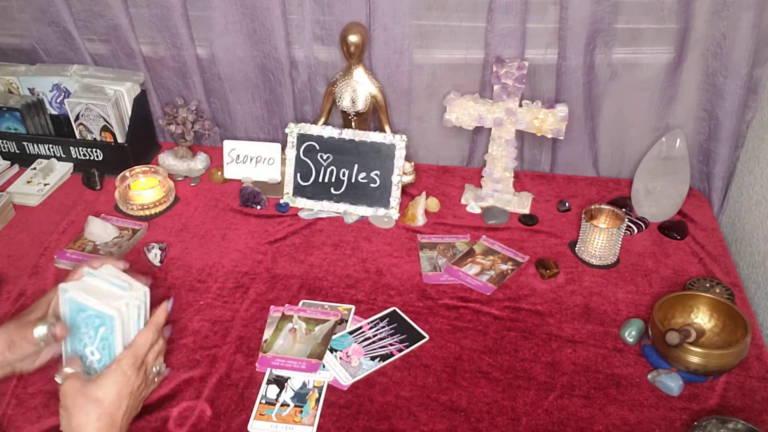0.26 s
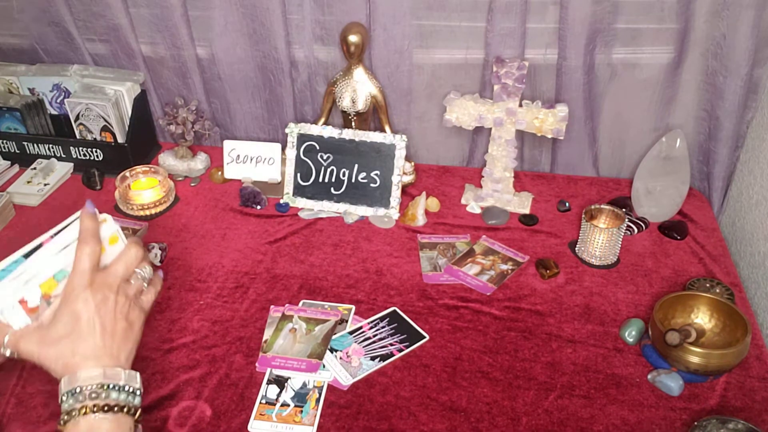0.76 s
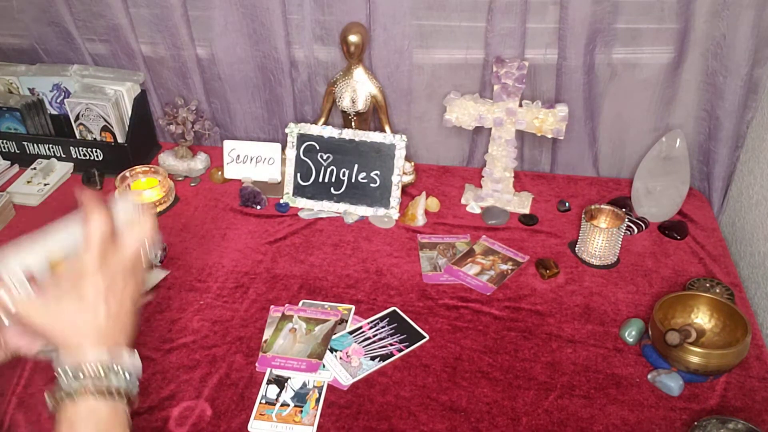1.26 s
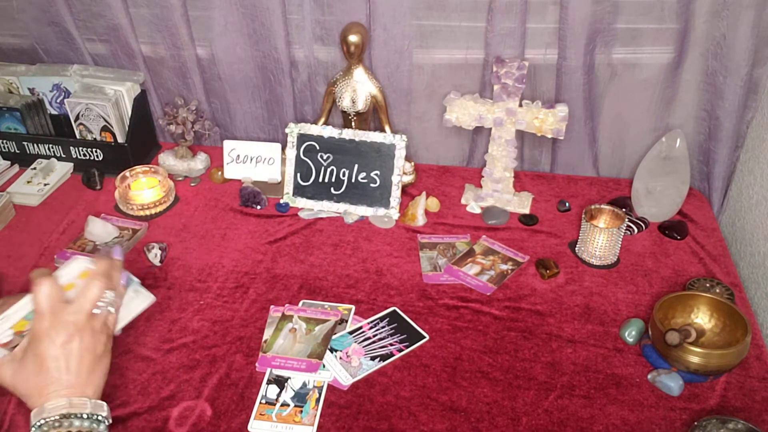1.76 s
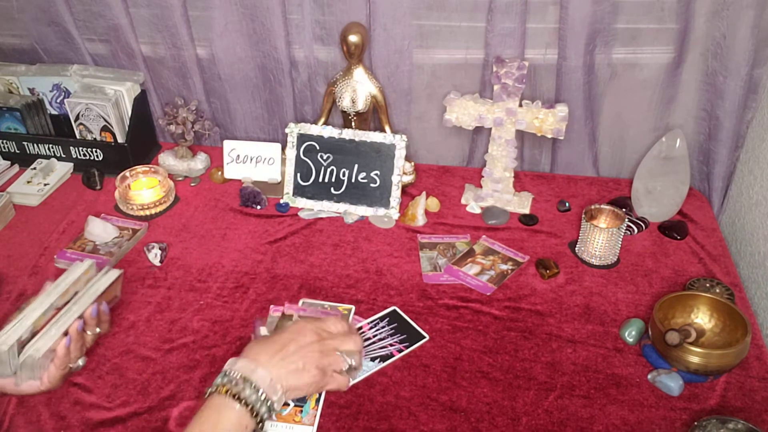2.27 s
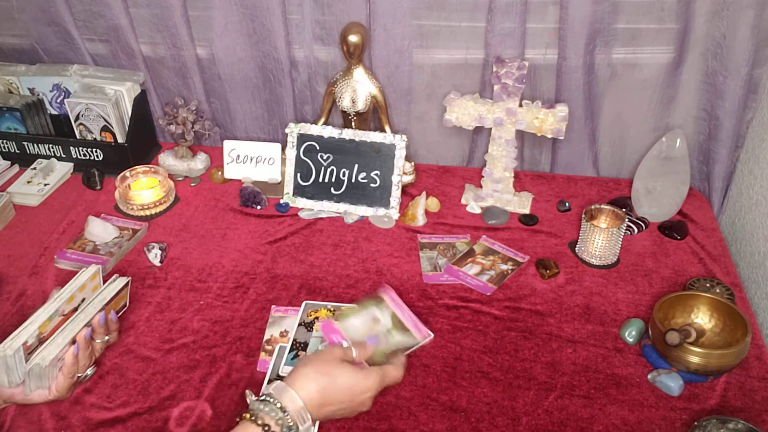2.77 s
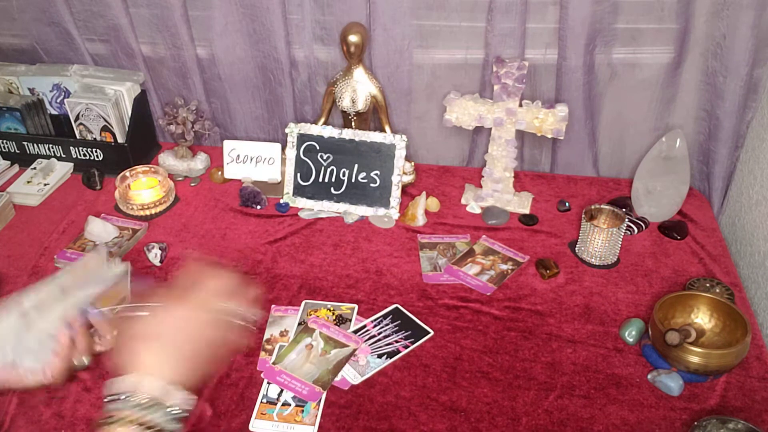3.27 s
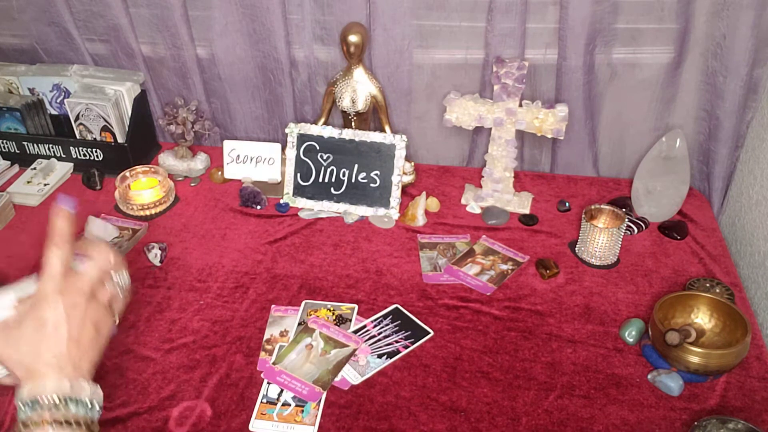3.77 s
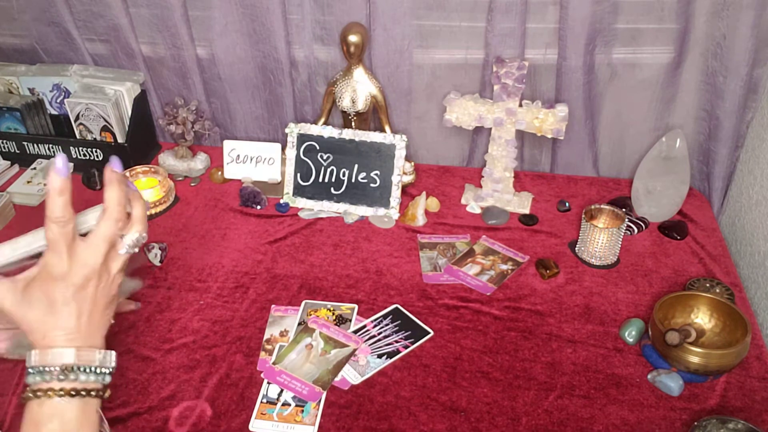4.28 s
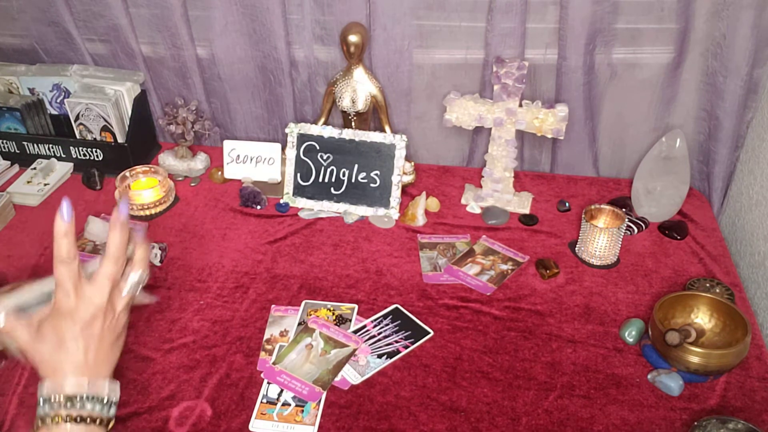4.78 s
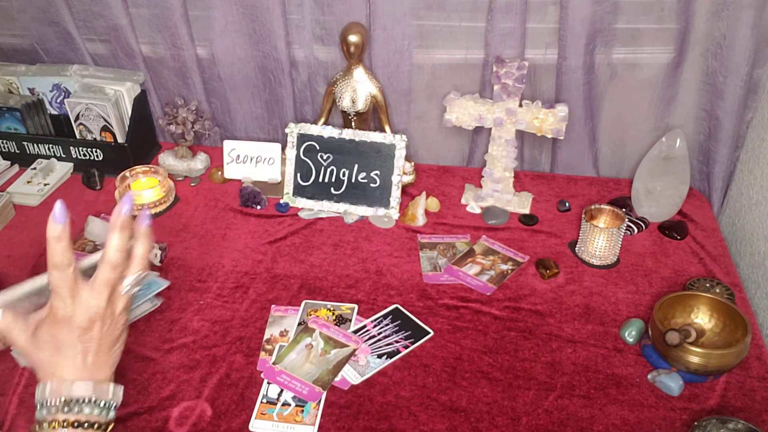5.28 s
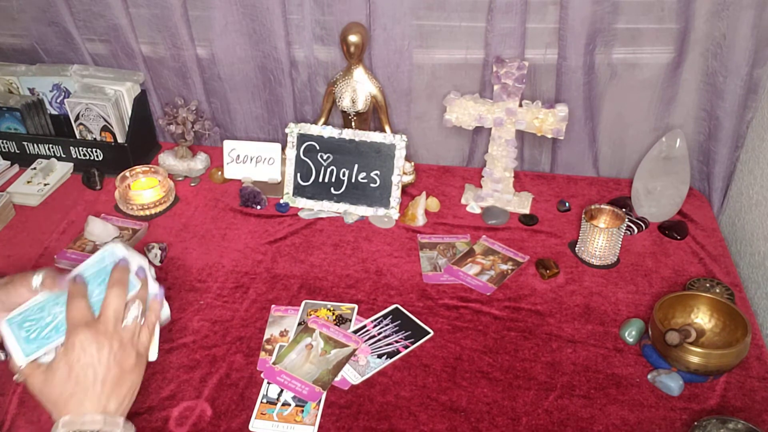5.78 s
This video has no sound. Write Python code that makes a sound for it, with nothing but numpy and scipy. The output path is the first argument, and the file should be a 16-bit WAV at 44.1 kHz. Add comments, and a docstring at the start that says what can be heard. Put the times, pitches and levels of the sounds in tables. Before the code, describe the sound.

In a small quiet room, a deck's edge knocks a cloth-covered table with a short woody ring. Hands then shuffle the cards: sharp papery snaps, loose flutter and grainy sliding. A softer pause follows as cards are handled lightly, then the shuffling returns faster and harder, with bright ring clinks and dry bead ticks. Close microphone, slight short echo.

```python
"""In a small quiet room, a thick deck of cards is shuffled overhand above a cloth-covered table.
First the deck is knocked on the table, which rings; then packets slap as snaps with loose flutter.
Sliding cards are grainy noise over a low rumble; finger rings clink as high ringing tones, and
bracelet beads tick as tiny noise bursts. Echoing delays give the hits their room."""
import sys
import numpy as np
from scipy import signal
from scipy.fft import rfft, irfft
from scipy.io import wavfile

SR = 44100
rng = np.random.default_rng(int(sys.argv[2]) if len(sys.argv) > 2 else 0)


def wav_record(signal):
    """Record a signal, one row per channel, as 16-bit PCM in the file named by sys.argv[1]."""
    frames = np.transpose(np.atleast_2d(signal))
    bounded = np.clip(frames, -1, 1)
    # unit amplitude maps onto the largest positive 16-bit level
    quanta = np.round(bounded * 32767).astype(np.int16)
    wavfile.write(sys.argv[1], SR, quanta)


N = 265967


def from_db(db):
    """Turn decibels into gain."""
    return 10 ** (np.asarray(db) / 20)


def rms_one(x):
    """Scale to an rms (average strength) of 1."""
    return x / np.sqrt(np.mean(x ** 2) + 1e-20)


def drift(rate_hz):
    """Slow random wander: noise through two equal one-pole low-passes, scaled to rms 1."""
    r = np.exp(-2 * np.pi * rate_hz / SR)
    settled = signal.lfilter([1], [1, -2 * r, r * r], rng.standard_normal(N + SR))[SR:]
    return rms_one(settled)


def ring(clicks, hz, t60):
    """Each click sets off a sine that falls by 60 dB in t60 seconds; a unit click starts it at height 1."""
    r = from_db(-60 / (t60 * SR))
    w = 2 * np.pi * hz / SR
    return signal.lfilter([0, np.sin(w)], [1, -2 * r * np.cos(w), r * r], clicks + 1e-18)


def band(x, low_hz, high_hz):
    """Keep only the pitches between two limits (Butterworth band-pass)."""
    limits = [low_hz, min(high_hz, 0.45 * SR)]
    return signal.sosfilt(signal.butter(2, limits, "band", fs=SR, output="sos"), x)


def burst(white, low_hz, high_hz, t60):
    """A dying burst of band noise with a peak of 1."""
    fade = from_db(-60 * np.arange(len(white)) / SR / t60)
    x = band(white, low_hz, high_hz) * fade
    return x / np.abs(x).max()


def coloured(x, spectrum):
    """Shape the tone of a noise by a spectrum table, then scale to rms 1."""
    hz, db = np.transpose(spectrum)
    grid = np.maximum(np.arange(N // 2 + 1) * SR / N, 1)
    gain = from_db(np.interp(np.log(grid), np.log(hz), db))
    return rms_one(irfft(rfft(x) * gain, N))


def grains(per_s, spread_db, smooth):
    """Tiny catches of card on card, uneven in size, over a smooth share of noise."""
    size_db = spread_db * np.minimum(rng.exponential(1, N), 3.5)
    sizes = from_db(size_db) * rng.choice([-1, 1], N)
    born = rng.random(N) < per_s * from_db(5 * drift(25)) / SR  # the catches come in clusters
    return rms_one(sizes * born) + smooth * rng.standard_normal(N)


def lumps(white, rate_hz, depth_db):
    """Uneven gain: loose cards touch and part again."""
    slow = signal.sosfilt(signal.butter(2, rate_hz, fs=SR, output="sos"), white)
    return from_db(depth_db * rms_one(slow))


def add(out, s, sound):
    """Mix a short sound in at time s."""
    at = round(s * SR)
    out[at:at + len(sound)] += sound[:N - at]


ROOM_T60_S, WALL_CUT_HZ, ROOM_DB = 0.46, 6700, -24  # fading time before the walls' dulling; dulling; level


def room(x):
    """Eight delays feed back into themselves, and each echo returns weaker and duller."""
    out = np.zeros(N)
    dull = np.exp(-2 * np.pi * WALL_CUT_HZ / SR)
    lags = (rng.uniform(0.011, 0.03, 8) * SR).astype(int)
    for k, lag in enumerate(lags):
        loop = x.copy()
        gain, state = from_db(-60 * lag / SR / ROOM_T60_S), [0.]
        for i in range(lag, N, lag):  # one block is one trip round the loop
            back, state = signal.lfilter([gain * (1 - dull)], [1, -dull], loop[i - lag:i], zi=state)
            loop[i:i + lag] += back[:N - i]
        out += (loop - x) * (-1) ** k
    return out


# How busily the cards slide, low when the hands pause; before random swells: (time [s], level [dB])
SLIDE_LEVEL = [(0, -50), (.09, -58), (.22, -53.5), (.34, -61), (.63, -61.5), (.69, -69), (.76, -57),
               (1.17, -60.5), (1.24, -70.5), (1.42, -50.5), (1.6, -58), (1.85, -63), (2.05, -60),
               (2.14, -75.5), (2.3, -74.5), (2.38, -59), (2.6, -59.5), (2.74, -70), (2.93, -67),
               (3.0, -55.5), (3.2, -58), (3.33, -63), (3.45, -57.5), (3.9, -52.5), (4.08, -56), (4.2, -59),
               (4.87, -47.5), (5.0, -51.5), (5.48, -44.5), (5.68, -55), (5.86, -49.5), (6.03, -61)]
# Tone of the hands' low rumble: (frequency [Hz], relative level [dB per Hz])
RUMBLE_TONE = [(15, -28), (30, -9.5), (55, 7), (110, -8), (220, -14), (450, -27.5), (900, -43.5)]
# Tone of card faces rubbing: (frequency [Hz], relative level [dB per Hz])
RUB_TONE = [(250, -12), (400, -0.5), (800, -5.5), (1300, -3), (2200, -7), (3500, -4), (5000, -3.5),
            (7000, -26), (10000, -29)]
# Tone of the bright card hiss: (frequency [Hz], relative level [dB per Hz])
HISS_TONE = [(2500, -14), (4500, 5.5), (6500, 7), (9000, 2.5), (12500, -1.5), (15000, -16.5), (16000, -5),
             (18000, -23)]
RUMBLE_DB, HISS_UNDER_RUB_DB = -49.5, -4.5  # at the mean rub level
RUMBLE_FOLLOWS, HISS_FOLLOWS = 0.4, 1.4  # share of the rub's swing in dB


def sliding():
    """Rumble of the hands, and the grainy rub and hiss of card faces and edges."""
    rub_db = np.interp(np.arange(N) / SR, *np.transpose(SLIDE_LEVEL))
    swing_db = rub_db - rub_db.mean()
    rumble_db = RUMBLE_DB + RUMBLE_FOLLOWS * swing_db
    hiss_db = rub_db.mean() + HISS_UNDER_RUB_DB + HISS_FOLLOWS * swing_db
    stick = drift(30)  # stick and slip swells rub and hiss together
    wobble_db = 2.5 * drift(10)
    rumble = from_db(rumble_db + wobble_db) * coloured(rng.standard_normal(N), RUMBLE_TONE)
    rub_noise = coloured(grains(600, spread_db=6.0, smooth=1.1), RUB_TONE)
    hiss_noise = coloured(grains(330, spread_db=19.5, smooth=1.0), HISS_TONE)
    rub = from_db(rub_db + 3.1 * stick) * rub_noise
    hiss = from_db(hiss_db + 3.4 * stick) * hiss_noise
    return rumble + rub + hiss


# Card faces dragged over each other; lengths are held to 0.01-0.24 s:
# (start time [s], length [s], level [dB], card pitch [Hz])
CARD_DRAGS = [(0.164, 0.088, -44, 2540), (0.943, 0.066, -66, 900), (1.095, 0.073, -49.5, 1510),
              (1.4, 0.097, -41, 1320), (1.885, 0.064, -42, 1250), (1.92, 0.054, -48, 1330),
              (1.968, 0.097, -49, 1220), (2.345, 0.075, -58, 1520), (2.414, .2, -56, 2290),
              (2.959, 0.088, -52, 1290), (3.009, 0.16, -52, 2180), (3.124, 0.11, -53.5, 1450),
              (3.363, 0.096, -48.5, 4350), (4.127, 0.027, -23, 1350), (4.207, 0.043, -34, 1410),
              (4.462, 0.14, -42, 1840), (4.76, 0.025, -23.5, 1320), (4.801, 0.094, -38, 1700),
              (5.071, 0.037, -32.5, 1610), (5.402, 0.036, -29, 1380), (5.473, 0.021, -26.5, 1750),
              (5.728, 0.063, -34, 1720), (5.765, 0.2, -45.5, 1600), (5.827, 0.021, -47, 9000)]


def drags():
    """Grainy friction over a wide band, leaning on the card's pitch, swells and fades smoothly."""
    out = np.zeros(N)
    noise = rng.standard_normal((len(CARD_DRAGS), 2, SR // 4))
    for (s, length, db, hz), white in zip(CARD_DRAGS, noise):
        swell = np.hanning(int(np.clip(length, 0.01, 0.24) * SR))
        catches = white[0] * lumps(white[1], 890, depth_db=4.0)
        wide = rms_one(band(catches, 0.32 * hz, hz + 3500))
        lean = rms_one(band(catches, 0.82 * hz, 1.22 * hz))
        friction = (wide + 0.7 * lean)[:len(swell)]
        add(out, s, from_db(db) * swell * friction)
    return out


# Bracelet beads ticking against each other: (time [s], peak level [dB])
BEAD_TICKS = [(0.5382, -41), (.72, -26.5), (0.749, -35), (1.281, -27), (1.4123, -16), (1.4618, -26),
              (1.5164, -28), (1.611, -17), (1.628, -26), (1.6375, -38), (1.723, -25), (1.7388, -22),
              (1.761, -22), (2.215, -42), (2.237, -24), (2.298, -31.5), (2.7305, -37.5), (2.7784, -41),
              (3.0493, -28.5), (3.403, -24), (3.733, -17.5), (3.787, -23), (3.879, -32.5), (3.915, -41),
              (4.3181, -42), (4.357, -25), (4.507, -20), (4.6832, -39), (4.806, -17), (4.914, -20),
              (4.9355, -29), (4.9573, -17), (5.017, -33), (5.281, -12.5), (5.449, -16.5), (5.529, -25),
              (5.5544, -35), (5.5664, -43), (5.797, -25), (5.896, -29), (5.915, -31)]


def beads():
    """Beads hit dryly: noise bursts that die in milliseconds, each with its own bright colour."""
    out = np.zeros(N)
    noise, hues = rng.standard_normal((len(BEAD_TICKS), SR // 50)), rng.random(len(BEAD_TICKS))
    for (s, peak_db), white, hue in zip(BEAD_TICKS, noise, hues):
        tick = burst(white, 3000 + 4000 * hue, 15300, 0.0057)
        add(out, s, from_db(peak_db) * tick)
    return out


# Jewellery clinks; low and middle are relative to the overall level and add to the ring levels below:
# (time [s], overall level [dB], low ring [dB], middle ring [dB])
JEWELLERY_CLINKS = [(0.7203, -32.5, 4, 13), (1.288, -26, 3, -29), (1.6107, -32, -34, -23),
                    (1.634, -36, -31, -8), (1.756, -33, -22, -16), (2.2022, -30.5, -1, -12),
                    (2.2961, -27, -36, -27), (2.6188, -35, -22, -21.5), (3.018, -34.5, -18, -17),
                    (3.1666, -39.5, -5, 7), (3.4935, -17.5, -12, -26), (3.5084, -23, -17, -18),
                    (3.521, -27, -25, -28), (3.532, -25, -22, -26), (4.1568, -22, -2, 4),
                    (4.342, -20.5, -12, -11), (4.374, -11.5, -6, -1.5), (4.6615, -24.5, -14, -24),
                    (4.6943, -12, 8, -3), (4.9647, -16, -29, 3.5), (5.2813, -16.5, 3, -2),
                    (5.3153, -28, 6, -15), (5.6046, -11.5, -7, -4), (5.6327, -24, -20, 3)]
# Ringing tones of the metal, in the order high, low, middle:
# (frequency [Hz], level [dB], time to fall 60 dB [s])
METAL_RINGS = [(12890, -2.5, 0.02), (8160, -13.5, 0.073), (8780, -14.5, 0.04)]


def clinks():
    """Metal on metal: quick bounces strike three high modes of varied strength, damped by the skin."""
    out = np.zeros(N)
    chances = rng.random((len(JEWELLERY_CLINKS), 2, 3))
    for (s, level_db, low_db, middle_db), luck in zip(JEWELLERY_CLINKS, chances):
        click = np.zeros(SR // 5)
        bounces = (luck[0] * 0.02 * SR).astype(int)
        click[bounces] = 0.35 * luck[1]
        click[0] = 1
        sound = from_db(4.0) * band(click, 2970, 15500)
        for (hz, db, t60), share_db in zip(METAL_RINGS, [0, low_db, middle_db]):
            # a quiet twin, slightly higher, beats against the tone and rings on
            twin = ring(click, hz * 1.003, 1.3 * t60)
            pair = ring(click, hz, t60) + from_db(-24) * twin
            sound = sound + from_db(db + share_db) * pair
        add(out, s, from_db(level_db) * sound)
    return out


# The deck's contacts with the table top: (time [s], blow strength [dB])
DECK_KNOCKS = [(0.1806, 0.5), (0.185, -12.5), (0.203, -5.5), (0.216, -37.5), (0.242, -29)]
# Ringing tones of the table, before the cloth softens them:
# (frequency [Hz], level [dB], time to fall 60 dB [s])
TABLE_MODES = [(108, -24, .45), (162.2, -3.5, .26), (319, -32, 0.22), (438.4, -9.5, 0.14),
               (489, -15.5, 0.24), (535, -25, 0.46), (594, -10.5, .2), (652, -11.5, 0.16), (712, -6, 0.063),
               (816, -16, 0.081), (866, -24, .16), (1064, -19, .15), (1200, -32.5, 0.16), (1387, -22, .13)]
# Dull part of the knock, relative levels: (frequency [Hz], width [Hz], level [dB])
DULL_BODY = [(183.6, 180, -6), (547, 140, -2.5), (744, 230, -1), (1250, 200, -7.5)]


def knock():
    """The deck's edge lands in a few bounces; each rings the table modes and a dull body of noise."""
    at = [round(s * SR) for s, db in DECK_KNOCKS]
    blow_db = np.array(DECK_KNOCKS)[:, 1]
    clicks, table = np.zeros(N), 0
    for hz, db, t60 in TABLE_MODES:
        clicks[at] = from_db(blow_db + db)
        table = table + ring(clicks, hz, t60)
    clicks[at] = from_db(blow_db)
    shake_fade = signal.lfilter([1], [1, -from_db(-60 / (0.17 * SR))], clicks)
    shake = shake_fade * rng.standard_normal(N)
    body = 0
    for hz, width, db in DULL_BODY:
        t60 = np.log(1000) / (np.pi * width)  # a wider tone dies faster
        body = body + from_db(db) * ring(shake, hz, t60)
    cloth = signal.butter(4, [115, 1300], "band", fs=SR, output="sos")  # the cloth softens the contact
    return signal.sosfilt(cloth, table + from_db(-25) * body)


FAINT_OVER_RUB_DB, FAINT_SPREAD_DB = 9, 18.5  # middle level over the rub; full range of levels
FAINT_PUSH_DB, FAINT_T60_S = -11, 0.075  # air push and flutter, as in the slap table


def faint_taps(count):
    """Stray cards touch at random moments, louder when the hands are busy; rows are like the slaps."""
    when, size, hue = rng.random((count, 3)).T
    s = when * (N / SR - 0.01)
    rub_db = np.interp(s, *np.transpose(SLIDE_LEVEL))
    db = rub_db + FAINT_OVER_RUB_DB + FAINT_SPREAD_DB * (size - 0.5)
    hz = 1100 * 4 ** hue
    return [(a, b, c, FAINT_PUSH_DB, FAINT_T60_S) for a, b, c in zip(s, db, hz)]


# Card slaps and taps; push is relative to the snap, flutter times are held to 0.004-0.2 s:
# (time [s], snap peak level [dB], card pitch [Hz], air push [dB], flutter time to fall 60 dB [s])
CARD_SLAPS = [(0.38, -16.5, 3330, -23, .01), (0.448, -35, 830, -10, 0.02), (0.748, -31.5, 1040, -6, 0.072),
              (0.787, -19.5, 5470, -27, 0.018), (.6, -55, 900, 7, 0.012), (.884, -40, 1280, -14, 0.028),
              (0.958, -43, 1320, 12, 0.021), (0.984, -32, 1200, -24, .048),
              (1.053, -40.5, 1460, -1.5, 0.018), (1.156, -23.5, 1540, -20.5, 0.02),
              (1.17, -28, 1970, -14, 0.0099), (1.357, -12, 1530, -9.5, 0.066),
              (1.366, -0.5, 2230, -45, 0.022), (1.391, -17, 2500, -5, 0.011),
              (1.397, -6.5, 1500, -13, 0.019), (1.44, -28, 900, -2, .025), (1.472, -26.5, 905, -7, 0.024),
              (1.492, -19.5, 2220, -12, 0.025), (1.497, -14, 1940, -21, 0.034),
              (1.571, -46, 800, 5.5, 0.014), (1.611, -38, 6010, -33, 0.026), (1.666, -15, 2680, -8.5, 0.06),
              (1.673, -20, 1220, -2.5, 0.016), (1.679, -19.5, 1490, -7, .04),
              (1.723, -30.5, 1430, -10, 0.044), (1.76, -29.5, 4900, -36, 0.022),
              (1.912, -36, 1170, -28, 0.033), (1.965, -28, 1200, -20, 0.038),
              (2.044, -28, 1180, -32, 0.049), (2.087, -35, 3340, -20, 0.01), (2.176, -45, 4470, -31, 0.014),
              (2.236, -21, 5600, -52, 0.019), (2.331, -25.5, 2040, -17, 0.022),
              (2.339, -26, 2150, -5, 0.064), (2.461, -31, 2230, -12, 0.012),
              (2.493, -29.5, 880, -6.5, 0.086), (2.548, -27.5, 4900, -23, 0.034),
              (2.619, -34, 5000, -29, 0.021), (2.709, -43, 1920, -19, 0.026),
              (2.994, -30.5, 1180, -14.5, .032), (3.07, -20.5, 2420, -18.5, 0.0049),
              (3.119, -17, 1620, -10, 0.078), (3.139, -24.5, 1200, 3, 0.025), (3.403, -40, 4220, -39, .03),
              (3.449, -28.5, 3760, -9, 0.069), (3.482, -28.5, 3900, -11, 0.2),
              (3.543, -10, 5200, -31, 0.014), (3.631, -25.5, 5660, -41, 0.019),
              (3.66, -32, 1150, -32, 0.021), (3.675, -32, 1200, -27, 0.05), (3.7, -37, 2320, -2.5, .03),
              (3.713, -37, 1110, -8.5, 0.073), (3.732, -29.5, 3020, -12, 0.031),
              (3.789, -19, 5400, -32, 0.011), (3.817, -39, 1990, -6, 0.057),
              (3.925, -13, 1300, -22.5, 0.025), (4.12, -8.5, 1200, -15.5, 0.085),
              (4.133, 4.5, 2130, -21.5, 0.012), (4.184, -3.5, 3240, -18.5, 0.018),
              (4.239, -13, 1580, -15.5, 0.048), (4.243, -22, 1680, -34, 0.035),
              (4.295, -11, 1250, -13, 0.045), (4.3, -21.5, 870, -5, 0.0088), (4.342, -36.5, 3380, 6, 0.027),
              (4.455, -14, 1620, -0.5, 0.21), (4.465, 0.5, 2000, -55, .034),
              (4.506, -10.5, 2120, -14, 0.033), (4.602, -19, 1070, -6, 0.074), (4.66, -39, 795, 12, .015),
              (4.752, -34, 990, 8.5, 0.069), (4.758, -6.5, 1240, -9, 0.054),
              (4.763, -3.5, 1530, -15.5, 0.073), (4.806, -12, 1480, -24, 0.04),
              (4.912, -9.5, 1350, -8, 0.042), (4.915, -19.5, 2150, -5, 0.016),
              (5.06, -10, 1830, -15.5, 0.059), (5.073, -7.5, 1460, -13.5, 0.064),
              (5.118, -11.5, 1900, -9, 0.066), (5.23, -1.5, 3450, -19, 0.021),
              (5.235, -9, 2080, -8.5, 0.053), (5.399, -25, 930, -0.5, 0.21), (5.414, -11, 1510, -7, 0.017),
              (5.449, -12, 3330, -11, 0.019), (5.482, -8, 1080, -16, 0.0093),
              (5.492, -9.5, 3030, -15, 0.041), (5.701, -25, 2150, -6.5, 0.14),
              (5.714, -4.5, 1390, -15, 0.24), (5.734, 3, 2360, -14.5, 0.033), (5.771, -17, 1370, -7, 0.1),
              (5.797, -16.5, 1440, -21, 0.034), (5.847, -22.5, 2770, -9, 0.039)]
EDGE_TICK_DB, FLUTTER_DB = -15, -14.5  # relative to the snap, for a slap of 0 dB
TICK_LAG, FLUTTER_LAG = 0.24, 0.16  # dB lost against the snap for each dB that the slap is harder


def slaps():
    """Each slap: a snap at the card's pitch, an edge tick, a low push of air, then fluttering cards."""
    out = np.zeros(N)
    t = np.arange(SR // 8) / SR
    click = (t == 0) * 1.0
    rows = CARD_SLAPS + faint_taps(count=24)
    noise, luck = rng.standard_normal((len(rows), 4, len(t))), rng.random((len(rows), 2))
    for (s, peak_db, hz, push_db, t60), white, (second, heft) in zip(rows, noise, luck):
        tick_db = EDGE_TICK_DB - TICK_LAG * peak_db
        flutter_db = FLUTTER_DB - FLUTTER_LAG * peak_db
        short, upper_hz = 4 / hz, hz * (1.6 + 1.4 * second)  # ring time [s]; second tone [Hz]

        two_tones = ring(click, hz, short) + 0.45 * ring(click, upper_hz, short)
        snap = band(two_tones, 0.6 * hz, 4.0 * hz)
        snap = snap / np.abs(snap).max()

        rise = np.minimum(t / 0.00092, 1)
        fade = from_db(flutter_db - 60 * t / np.clip(t60, 0.004, 0.2)) * rise
        catches = white[0] * lumps(white[3], 330, depth_db=2.0)
        wide = rms_one(band(catches, 0.29 * hz, min(2.1 * hz, hz + 3000)))
        modes = rms_one(ring(catches, hz, 3 * short)) + 0.7 * rms_one(ring(catches, upper_hz, 2 * short))
        flutter = (wide + 0.35 * modes) * fade

        tick = from_db(tick_db) * burst(white[1], 3800, 20000, 0.0013)
        push = ring(click, 55 + 110 * heft, 0.085) + 1.484 * burst(white[2], 39, 450, 0.051)
        add(out, s, from_db(peak_db) * (snap + flutter + tick + from_db(push_db) * push))
    return out


def scene():
    """Hits sound into the room; the slide is heard close, without echoes."""
    hits = knock() + slaps() + drags() + clinks() + beads()
    return (hits + from_db(ROOM_DB) * room(hits) + sliding())[None]


# Microphone colour: (frequency [Hz], width [Hz], boost or cut [dB])
MIC_COLOUR = [(2660, 980, 1.5), (6960, 5400, -5.5), (16300, 5300, -5.5)]
CUTOFF_HZ = 17000


def record(dry):
    """Microphone colour and bass roll-off; the input squashes the loudest peaks; the top is cut."""
    for hz, width, db in MIC_COLOUR:
        peak = signal.lfilter(*signal.iirpeak(hz, hz / width, fs=SR), dry)
        dry = dry + (from_db(db) - 1) * peak
    dry = signal.sosfilt(signal.butter(2, 32, "high", fs=SR, output="sos"), dry)
    squashed = dry / (1 + np.abs(dry) ** 8) ** (1 / 8)
    return signal.sosfilt(signal.cheby2(14, 90, CUTOFF_HZ, fs=SR, output="sos"), squashed)


dry = scene()
out = record(dry)
wav_record(out)
```